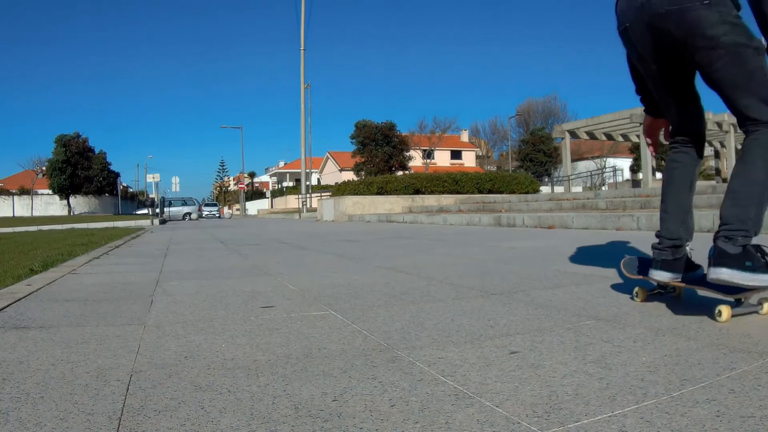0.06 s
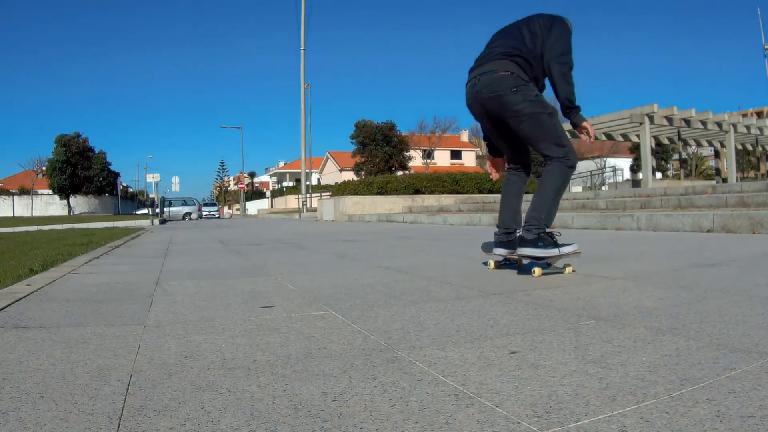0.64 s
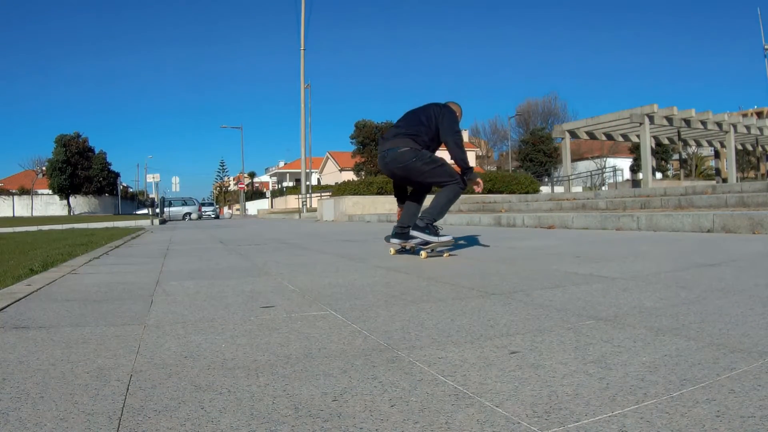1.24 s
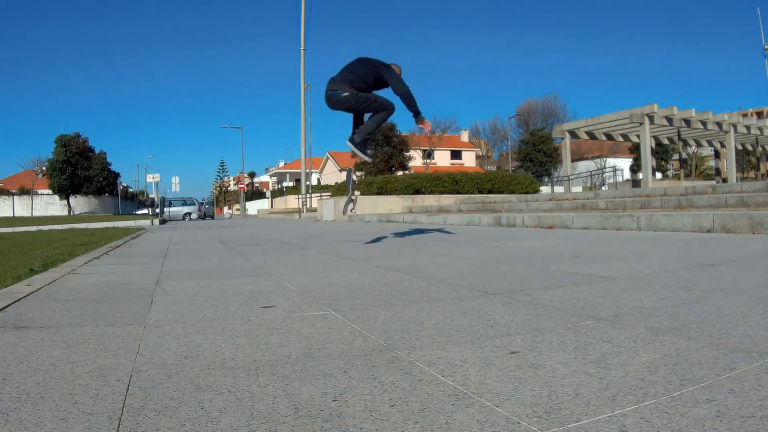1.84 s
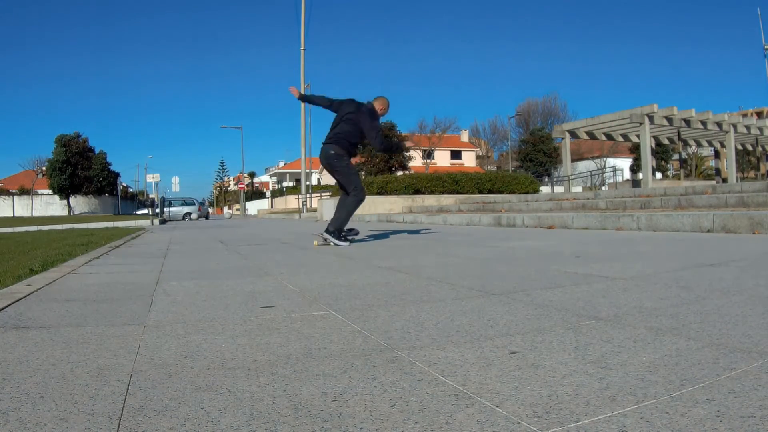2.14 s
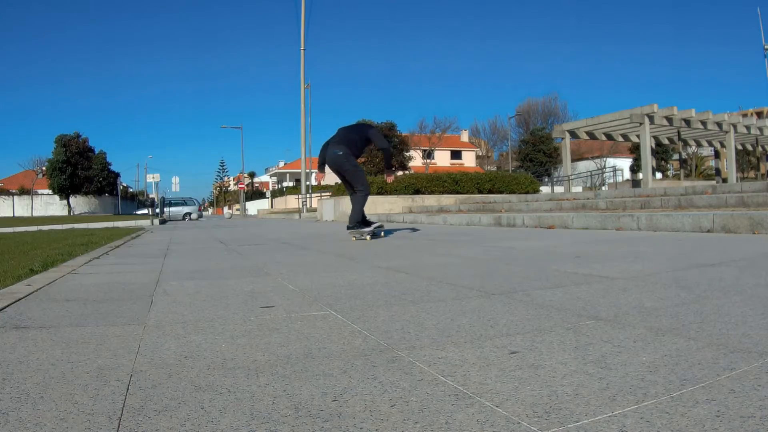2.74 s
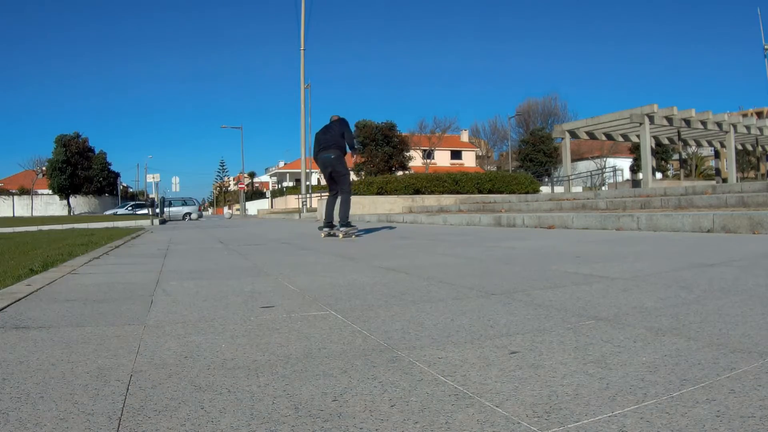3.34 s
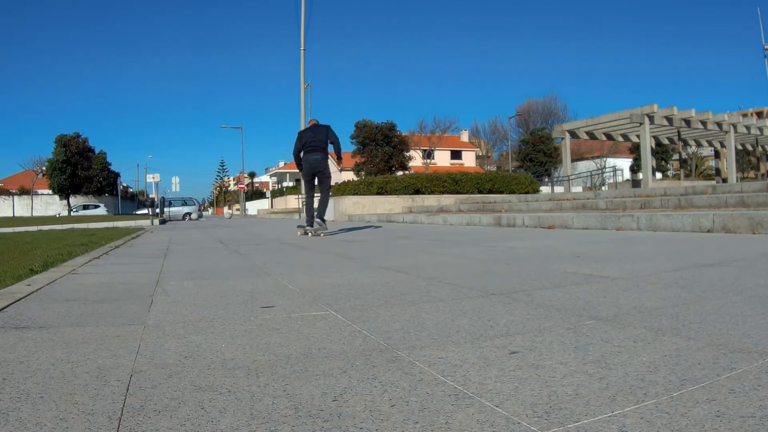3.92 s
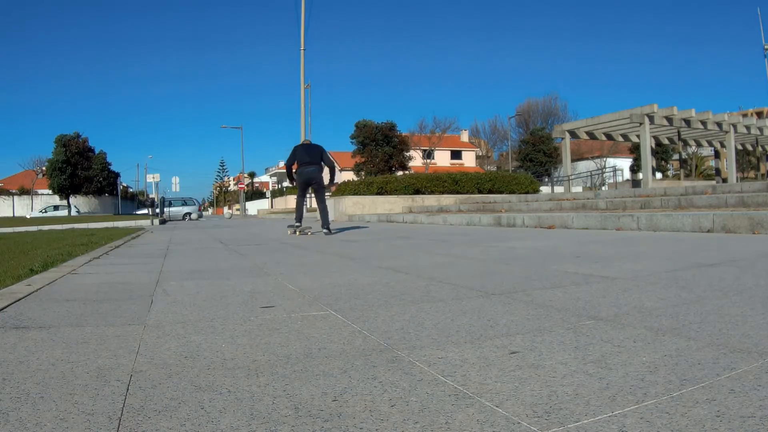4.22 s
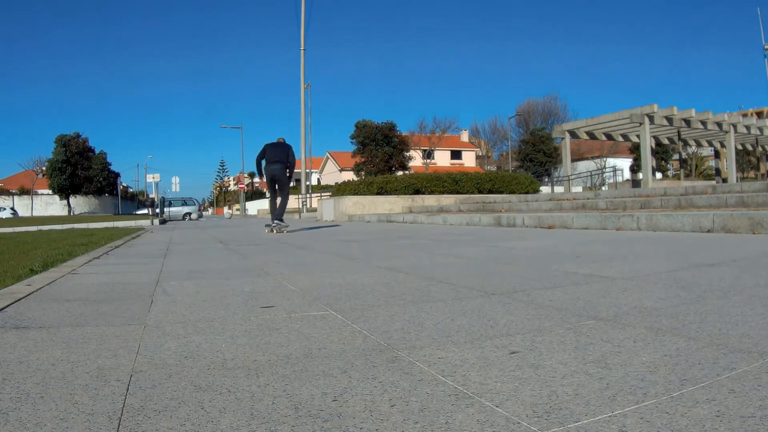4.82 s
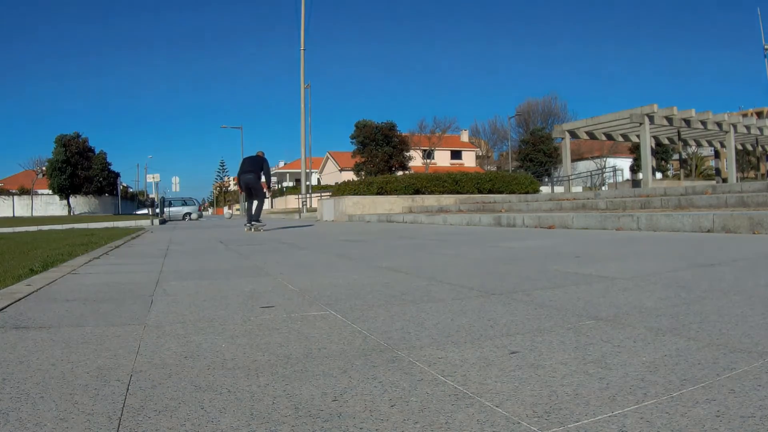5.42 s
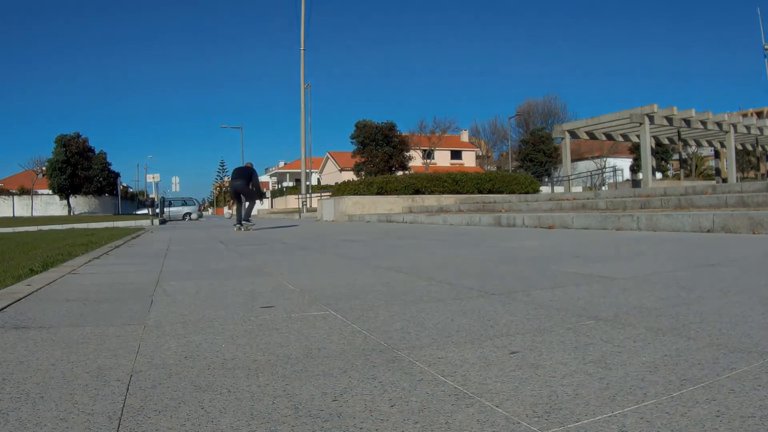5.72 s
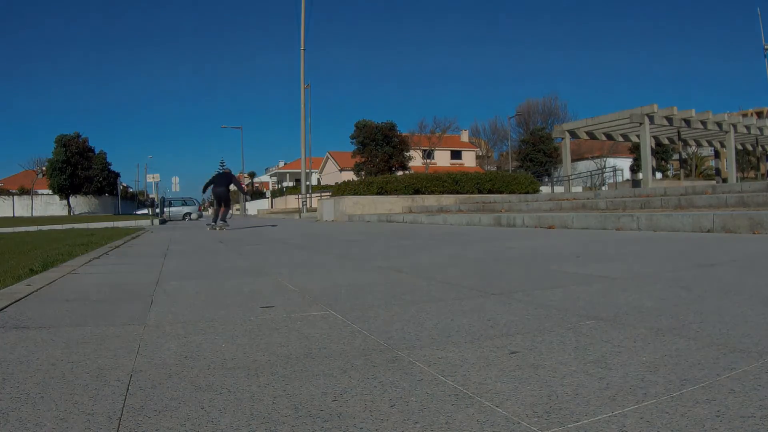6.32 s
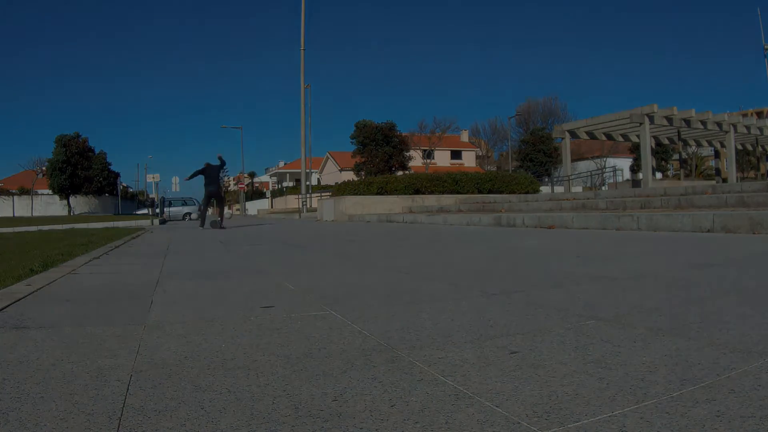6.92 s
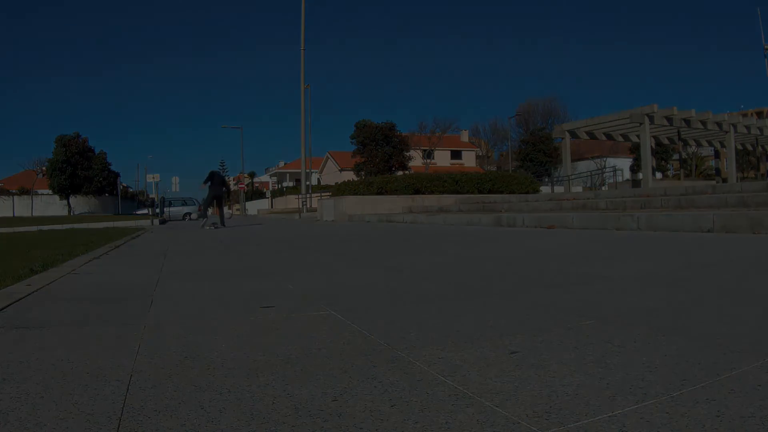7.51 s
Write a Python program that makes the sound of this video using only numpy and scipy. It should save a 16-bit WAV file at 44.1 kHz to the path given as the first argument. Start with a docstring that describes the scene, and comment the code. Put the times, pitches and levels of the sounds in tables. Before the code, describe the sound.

In an open plaza with faint town noise behind, gritty skateboard wheels roll away from a fixed microphone, clicking over slab joints. A snap of the wooden deck starts a jump, followed by a clacking landing and a brief, low wheel squeal. The rolling continues more softly with a few light knocks, until a distant second trick slams down with the sharpest crack and a short rattle, echoing faintly.

```python
"""Open plaza, stone slabs, distant town noise. A skateboard rolls away: the stone's grain shakes the
wheels, which knock across the joints. The rider pops a flip trick, lands, skids the board round
(stick-slip), sets the nose down and rolls on. Farther off a second trick comes down with a hard crack.
Blows ring the maple deck and steel trucks; steps and far walls return a faint tail."""
import sys
import numpy as np
from scipy import signal
from scipy.fft import rfft, irfft
from scipy.io import wavfile

SR = 44100
rng = np.random.default_rng(int(sys.argv[2]) if len(sys.argv) > 2 else 0)


def dump_mix(stems):
    """Bounce the given channels to the path in sys.argv[1] as a 16-bit WAV at rate SR."""
    frames = np.atleast_2d(stems).T  # one column per channel
    limited = np.clip(frames, -1, 1)  # hard clip at full scale
    pcm = np.round(limited * 32767).astype(np.int16)
    wavfile.write(sys.argv[1], SR, pcm)


N = 337806
TIME = np.arange(N) / SR
AGE = TIME[:SR // 5]   # time within one hit, s

# board speed: [t/s, v/(m/s)]
SPEED = [(0, 3.02), (1.35, 2.71), (2.2, 1.98), (3.3, 0.87), (4.2, 1.59), (5.3, 1.39), (6.3, 2.84),
         (7.66, 2.8)]
# rider loads (+) or unloads (-) the wheels: [t/s, gain/dB, half length/s]
LEANS = [(0.214, 3.5, 0.078), (0.622, -2.5, 0.032), (1.082, 5.5, 0.3), (1.47, -4.5, 0.042),
         (2.357, 7.5, 0.054), (2.664, 12, 0.13), (3.61, 10, .09), (4.134, 6, 0.17), (4.838, 8, 0.47),
         (5.55, 10, 0.098), (6.273, 3, 0.097), (7.225, 6.5, 0.12)]
# wheels off the ground: [take-off t/s, touch-down t/s]
FLIGHTS = [(1.53, 1.96), (6.5, 6.87)]
# loose wheels and trucks after a hard blow: [t/s, level/dB, decay/s]
RATTLES = [(1.571, -53.5, 0.25), (2.05, -44.5, 0.089), (6.942, -45.5, 0.11)]
# wheel resonances: [f/Hz, width/Hz, level/dB]
WHEEL_MODES = [(487, 120, -12.5), (680, 68, -12.5), (971, 120, -15.5), (2720, 381, -23.5),
               (6500, 700, -40.5)]
# noise spectra of wheel rumble, grit hiss and town: [f/Hz, density/dB]
RUMBLE_SPECTRUM = [(40, -11), (110, -9.5), (170, -6.5), (250, 0.5), (380, -3.5), (520, -4), (800, -5.5),
                   (1020, -7), (1250, -7.5), (1730, -11), (2170, -21.5), (2640, -23.5), (3400, -36.5),
                   (7000, -48.5)]
GRIT_SPECTRUM = [(1500, -15.5), (3300, 2), (4000, 2), (5000, -3), (6300, -4.5), (8000, -8.5), (10800, -8),
                 (12500, -13), (15000, -16)]
TOWN_SPECTRUM = [(20, -4), (45, -4.5), (100, 2), (200, -3.5), (400, -7.5), (650, -8), (1000, -13.5),
                 (1600, -15), (2200, -23.5), (3400, -32.5), (5000, -31.5), (8000, -36), (11500, -38),
                 (15000, -48.5)]
# reverberation bands: [low f/Hz, high f/Hz, level/dB, T60/s]
PLAZA_BANDS = [(128, 410, -48.5, 0.64), (800, 2200, -23.5, 0.49), (2300, 8400, -16.5, 0.37)]
# slab joint crossings: [t/s, front level/dB, rear level/dB, f/Hz, left-right lag/s, tick/dB]
JOINTS = [(.139, -36.5, -36, 303, .0095, -5), (0.42, -38, -43, 396, .008, -6.5),
          (.708, -43.5, -39.5, 570, 0.0017, -10), (0.991, -42.5, -50, 445, 0.00207, -20),
          (1.274, -45.5, -43.5, 273, 0.0055, -6)]
# deck and trucks slam in pops and landings: [t/s, level/dB, contact f/Hz, chatter/s, thump/dB, crack/dB]
SLAPS = [(1.5209, -23.5, 1016, 0.0079, -2, 2.5), (1.54, -36.5, 990, 0.013, -5, 4),
         (1.9986, -15, 900, 0.00083, -3.5, -16), (2.008, -19.5, 730, 0.00099, -23, -25),
         (2.0101, -13.5, 667, .0028, -9, -31), (2.0186, -23.5, 900, 0.0011, -4, -9),
         (2.0426, -20.5, 786, .0045, 2, -24), (6.695, -29, 1500, 0.0093, -6.5, -9.5),
         (6.82, -23.5, 720, 0.012, -16, -6), (6.8772, -8, 1580, 0.00081, -21, -0.5),
         (6.8802, -15.5, 1750, 0.0013, -20.5, -13.5), (6.8875, -26.5, 1000, .0025, -5.5, 0),
         (6.9074, -26, 925, 0.001, -17.5, -20.5)]
# wheels and shoes come down under load: [t/s, level/dB, contact f/Hz, thump/dB, crack/dB]
KNOCKS = [(1.891, -39, 730, 2, -1), (1.968, -23, 825, 2, -20), (1.982, -21, 910, -20, -7),
          (2.028, -31, 504, -7, 1), (2.177, -45, 800, -13, -2.5), (2.603, -41.5, 590, -21, -21),
          (2.882, -31.5, 553, -4.5, -7), (3.763, -41, 1460, 3, -11), (3.782, -48, 704, -9, -3),
          (4.378, -39, 610, 1.5, -18), (4.607, -45.5, 138, -15, -24), (4.616, -43, 660, -3, -28),
          (4.922, -39, 740, -4, -13), (6.449, -38, 1380, -2.5, -16), (6.9213, -26.5, 1000, -1.5, -5.5),
          (7.115, -36, 680, -22, -15), (7.1488, -31.5, 560, -10, -21), (7.279, -43.5, 585, -17, -22)]
# unloaded deck clatters: [t/s, level/dB, contact f/Hz]
TAPS = [(1.593, -42.5, 1150), (1.707, -46.5, 1240), (2.066, -34, 1520), (6.9268, -23.5, 1507),
        (6.969, -47, 1720), (7.003, -35, 1610), (7.216, -46.5, 1670), (7.253, -48.5, 1700)]
# modes of the maple deck with its trucks: [f/Hz, width/Hz, level/dB]
DECK_MODES = [(237, 11, -15), (317.7, 29, -8.5), (432, 22, -4), (495.3, 15, 2.5), (628.5, 64, 8.5),
              (620, 130, 4.5), (722, 18, -4), (902, 29, 3), (1008, 46.1, 3), (1098, 28, -8.5),
              (1262, 45, -1), (1500, 51, -1), (1521, 58, 3.5), (1750, 53, -9), (2100, 34, -11.5),
              (2600, 27, -27.5), (2925, 180, -14.5), (3900, 320, -26)]
# bright modes of trucks and plies: [f/Hz, width/Hz, level/dB]
CRACK_MODES = [(1940, 400, 11), (2770, 290, 4.5), (3380, 890, -6.5), (5700, 300, -1.5), (7110, 610, -5.5)]
# steel trucks clink: [t/s, level/dB, f/Hz]
CLINKS = [(1.533, -37, 3820), (1.895, -68, 4460), (6.8793, -42.5, 6800), (6.896, -47, 5000)]
# shoes and tail scrape grip tape and stone: [t/s, level/dB, rise/s, decay/s]
SCUFFS = [(1.540, -44.5, 0.009, 0.015), (1.999, -35.5, .0005, 0.017), (2.17, -69, .012, 0.028),
          (2.375, -60.5, .008, .012), (2.604, -63, .001, 0.013), (6.8784, -39.5, .0003, 0.00042),
          (6.9215, -41, 0.00027, 0.0084)]
# wheel skid in the pivot: [t/s, f/Hz, level/dB]
SKID = [(2.48, 372, -88), (2.53, 352.4, -57), (2.58, 331.7, -53), (2.64, 266, -48), (2.69, 247, -80),
        (2.73, 216.8, -52.5), (2.82, 194, -80)]
# wheel hum on the roll-out: [t/s, f/Hz, level/dB]
HUM = [(7.15, 639, -76), (7.32, 625, -59.5), (7.42, 600, -77), (7.52, 589, -59), (7.59, 594, -61.5),
       (7.66, 587, -87)]


def from_db(db):
    """Decibels to gain."""
    return 10 ** (np.asarray(db) / 20)


def unit_rms(x):
    """Scale to rms 1."""
    return x / np.sqrt(np.mean(x ** 2) + 1e-20)


def unit_hit(x):
    """Scale to the energy of 10 ms at rms 1."""
    return x / np.sqrt(np.sum(x ** 2) / (SR / 100) + 1e-20)


def per_sample(rows):
    """Interpolate a curve's columns to every sample."""
    times, *columns = np.transpose(rows)
    return [np.interp(TIME, times, column) for column in columns]


def add(out, t, sound):
    """Mix in at t seconds."""
    at = max(round(t * SR), 0)
    out[at:at + len(sound)] += sound[:N - at]


def band(x, low_hz, high_hz, order=2):
    """Causal band-pass."""
    sos = signal.butter(order, [low_hz, high_hz], "band", fs=SR, output="sos")
    return signal.sosfilt(sos, x + 1e-18)


def resonate(x, hz, width_hz):
    """One resonance, peak gain 1."""
    r = np.exp(-np.pi * width_hz / SR)
    feedback = [1, -2 * r * np.cos(2 * np.pi * hz / SR), r * r]
    return signal.lfilter(np.array([1, 0, -1]) * (1 - r * r) / 2, feedback, x + 1e-18)


def colour(x, spectrum):
    """Impose a spectrum; rms 1."""
    hz, db = np.transpose(spectrum)
    bin_hz = np.maximum(np.arange(N // 2 + 1) * SR / N, 1)
    skirts = np.minimum(bin_hz / hz[0], 1) * np.minimum(hz[-1] / bin_hz, 1) ** 2
    gain = from_db(np.interp(np.log(bin_hz), np.log(hz), db))
    return unit_rms(irfft(rfft(x) * skirts * gain, N))


def drift(rate_hz):
    """Random wander, spread about 1."""
    return np.interp(TIME * rate_hz, np.arange(N), rng.standard_normal(N))


def wheel_shake(rumble_db, start_m=2.17, cruise_m_per_s=2.0, flight_db=-13.5, lift_s=0.04):
    """Rumble envelope re rumble_db: up with speed, load and rattle, down with distance and in flight."""
    speed, = per_sample(SPEED)
    distance_m = start_m + np.cumsum(speed) / SR
    load_db = sum(db * np.exp(-((TIME - t) / half_s) ** 2) for t, db, half_s in LEANS)
    airborne = sum(np.clip(np.minimum(TIME - up, down - TIME) / lift_s, 0, 1) for up, down in FLIGHTS)
    roll = from_db(load_db + flight_db * airborne) * (speed / cruise_m_per_s) ** 1.28 / distance_m
    rattle = sum(from_db(db) * (TIME > t) * np.exp(-abs(TIME - t) / decay_s)
                 for t, db, decay_s in RATTLES)
    return np.hypot(roll, rattle / from_db(rumble_db))


def rolling(rumble_db=-41, grit_db=-65):
    """Stone grain and rough patches shake wheels and deck. Levels at 1 m and cruise speed."""
    shake = wheel_shake(rumble_db)
    surface = rng.standard_normal(N) * from_db(0.5 * drift(1500) + 1.5 * drift(45))   # grain, patches
    ringing = sum(from_db(db) * unit_rms(resonate(resonate(surface, hz, width_hz), hz, 3 * width_hz))
                  for hz, width_hz, db in WHEEL_MODES)
    # ringing swings more than the rumble, grit less
    wheels = shake * colour(surface, RUMBLE_SPECTRUM) + shake ** 1.3 * ringing
    grit = shake ** 0.62 * colour(surface, GRIT_SPECTRUM)
    return from_db(rumble_db) * wheels + from_db(grit_db) * grit


def town(level_db=-59.5):
    """Distant town: steady, dull noise."""
    return from_db(level_db) * colour(rng.standard_normal(N), TOWN_SPECTRUM)


def plaza_echo(x, rise_s=0.0063):
    """Steps and far walls scatter a faint tail; treble dies first."""
    t = TIME[:SR]
    tail = np.zeros(SR)
    for low_hz, high_hz, db, t60_s in PLAZA_BANDS:
        energy_norm = np.sqrt(2 * np.log(1000) / (t60_s * SR))
        tail += band(rng.standard_normal(SR), low_hz, high_hz) * from_db(db - 60 * t / t60_s) * energy_norm
    return signal.fftconvolve(x, tail * (1 - np.exp(-t / rise_s)))[:N]


def contact_force(noise, chatter_s, click_s=0.00066):
    """A click, then gritty chatter as load builds; the longer the chatter, the more it dominates."""
    grain_db = 4.5 * np.interp(AGE * 2000, np.arange(len(AGE)), noise[1])
    grit = unit_rms(noise[0] * from_db(grain_db))
    load = (1 - np.exp(-AGE / (0.27 * chatter_s))) * np.exp(-AGE / chatter_s)
    return (AGE == 0) + grit * load * np.sqrt(2 / (click_s * SR))


def joints(axle_lag_s=0.0815, wheel_q=5):
    """Four soft wheels drop into each joint in turn: low knock, thud and grit tick."""
    out = np.zeros(N)
    for t, front_db, rear_db, hz, skew_s, tick_db in JOINTS:
        for axle_s, axle_db in ((0, front_db), (axle_lag_s, rear_db)):
            for side_s, side_db in ((0, -2), (skew_s, 2)):   # second wheel drops harder
                force = contact_force(rng.standard_normal((2, len(AGE))), chatter_s=0.0033)
                knock = unit_hit(band(resonate(force, hz, hz / wheel_q), 91, 1330))
                thud = unit_hit(band(band(force, 170, 580, order=1), 124, 1900))
                tick = unit_hit(band(band(force, 830, 1130, order=1), 280, 7300))
                drop = unit_hit(knock + thud + from_db(tick_db) * tick)
                add(out, t + axle_s + side_s, from_db(axle_db + side_db) * drop)
    return out


def ring(force, modes, spot_db):
    """Mode bank; the spot struck weights each mode."""
    return sum((-1) ** k * from_db(db + spot_db[k]) * resonate(force, hz, width_hz)
               for k, (hz, width_hz, db) in enumerate(modes))


def strike(hz, chatter_s, thump_db, crack_db, contact_db=5.5, contact_q=4):
    """One blow rings deck, contact spot and trucks. Levels re the deck."""
    noise = rng.standard_normal((3, len(AGE)))
    force = contact_force(noise, chatter_s)
    spot_db = 3.5 * noise[2]
    deck = band(ring(force, DECK_MODES, spot_db), 110, 6300)
    contact = band(resonate(force, hz, hz / contact_q), 140, 1700)
    thump = band(force, 227, 430)   # rider's weight through the soft wheels
    slab_boom = band(force, 105, 200, order=3)
    crack = ring(force, CRACK_MODES, spot_db[::-1])
    crack = band(band(crack, 1500, 4900), 830, 11000, order=5)
    parts = ((deck, 0), (contact, contact_db), (thump, thump_db),
             (slab_boom, thump_db - 14), (crack, crack_db))
    return unit_hit(sum(from_db(db) * unit_hit(part) for part, db in parts))


def blows():
    """Slaps, knocks and light taps ring the same board."""
    out = np.zeros(N)
    for t, db, hz, chatter_s, thump_db, crack_db in SLAPS:
        add(out, t, from_db(db) * strike(hz, chatter_s, thump_db, crack_db))
    for t, db, hz, thump_db, crack_db in KNOCKS:
        knock = strike(hz, chatter_s=0.00866, thump_db=thump_db, crack_db=crack_db)
        add(out, t, from_db(db) * knock)
    for t, db, hz in TAPS:
        tap = strike(hz, chatter_s=0.0089, thump_db=-21, crack_db=-18, contact_db=13.5)
        add(out, t, from_db(db) * tap)
    return out


def clinks(decay_s=0.0017, width_hz=450):
    """Washers rattle briefly against the truck."""
    out = np.zeros(N)
    for t, db, hz in CLINKS:
        rattle = rng.standard_normal(len(AGE)) * np.exp(-AGE / decay_s)
        clink = band(resonate(rattle, hz, width_hz), 2500, 7800)
        add(out, t, from_db(db) * unit_hit(clink))
    return out


def scuffs(grit_db=-20, grit_rise_s=0.003, grit_decay_s=0.007):
    """Bright, grainy friction: scrapes, plus grit crushed under each knock."""
    grains = rng.standard_normal(N) * from_db(6.4 * drift(620))
    friction = unit_rms(band(grains, 3900, 11300, order=5))
    crushes = [(t, db + grit_db, grit_rise_s, grit_decay_s) for t, db, *_ in KNOCKS]
    envelope = np.zeros(N)
    for t, db, rise_s, decay_s in SCUFFS + crushes:
        add(envelope, t, from_db(db) * (1 - np.exp(-AGE / rise_s)) * np.exp(-AGE / decay_s))
    return envelope * friction


def stick_slip(curve, overtone_step_db, jitter):
    """Urethane sticks and slips: a wavering tone with falling overtones."""
    hz, db = per_sample(curve)
    phase = 2 * np.pi * np.cumsum(hz * (1 + jitter * drift(100))) / SR
    tone = unit_rms(sum(from_db(k * overtone_step_db) * np.sin((k + 1) * phase) for k in range(4)))
    gate = (TIME > curve[0][0]) & (TIME < curve[-1][0])
    return tone * from_db(db + 2 * drift(72)) * gate


def scene():
    """Board, town and the board's echo; mono."""
    board = rolling() + joints() + blows() + scuffs() + clinks()
    board += stick_slip(SKID, overtone_step_db=-3.5, jitter=0.014)
    board += stick_slip(HUM, overtone_step_db=-26, jitter=0.012)
    return (board + town() + plaza_echo(board))[None]


def record(dry, cutoff_hz=15300):
    """Soft overload on the hardest crack, then a steep low-pass."""
    clipped = dry / (1 + dry ** 6) ** (1 / 6)
    return signal.sosfilt(signal.ellip(10, .1, 80, cutoff_hz, fs=SR, output="sos"), clipped)


dry = scene()
out = record(dry)
dump_mix(out)
```